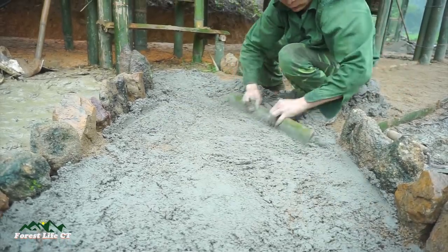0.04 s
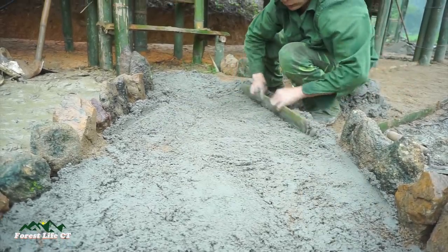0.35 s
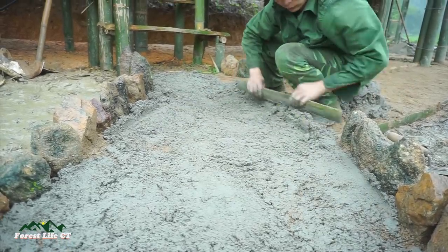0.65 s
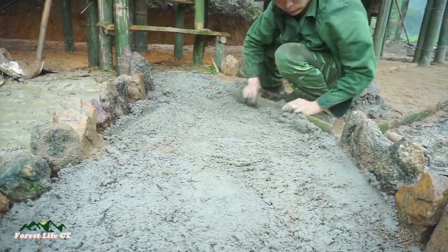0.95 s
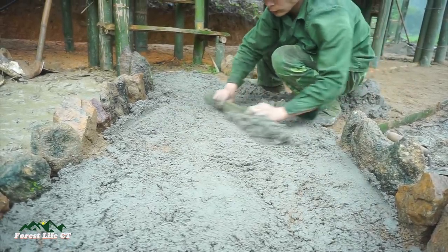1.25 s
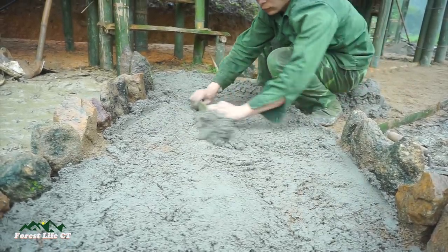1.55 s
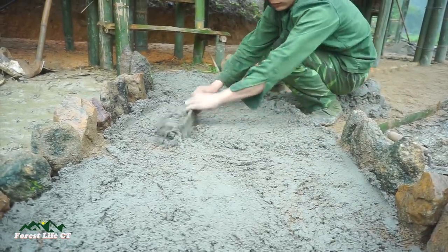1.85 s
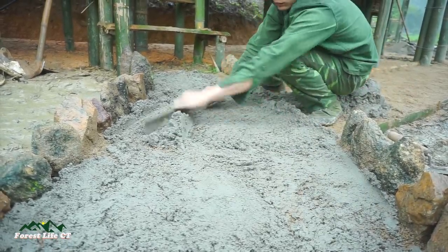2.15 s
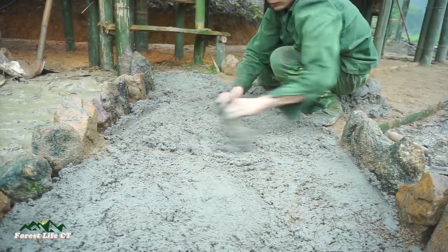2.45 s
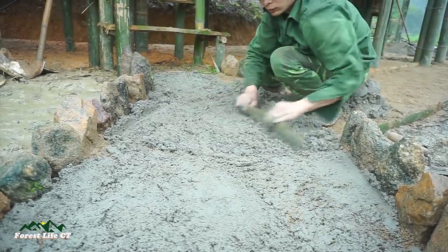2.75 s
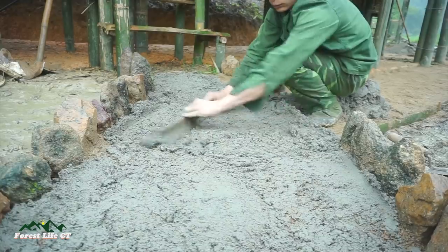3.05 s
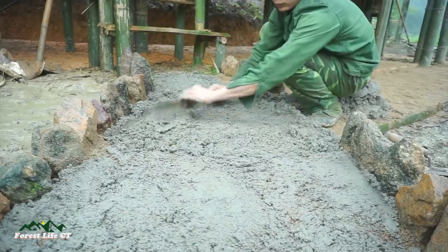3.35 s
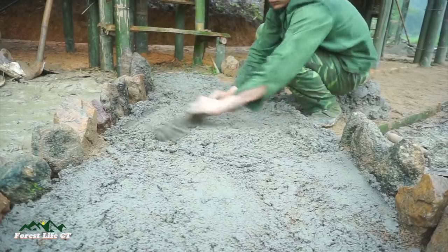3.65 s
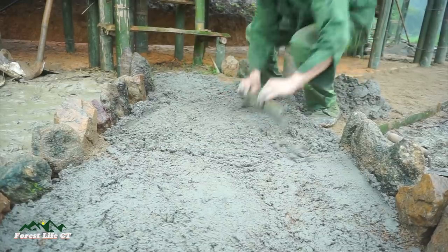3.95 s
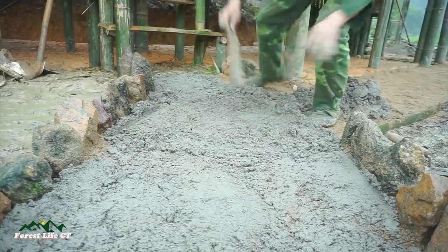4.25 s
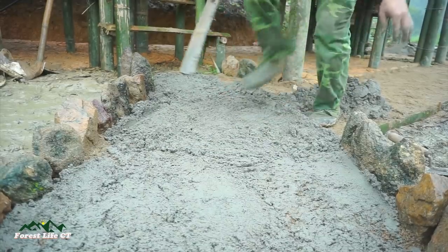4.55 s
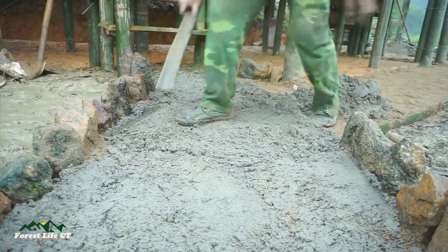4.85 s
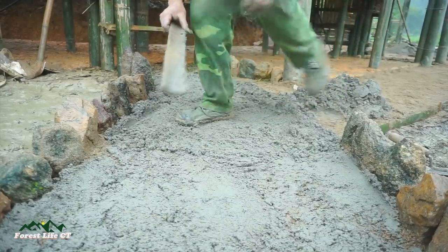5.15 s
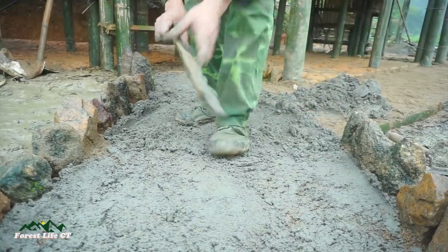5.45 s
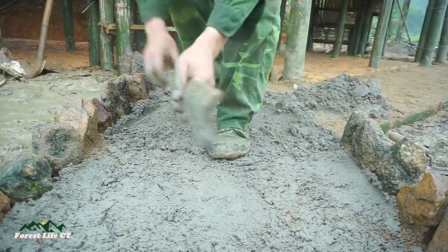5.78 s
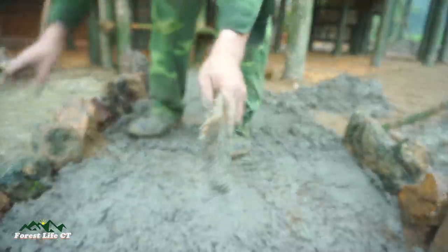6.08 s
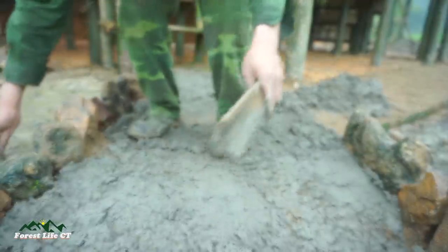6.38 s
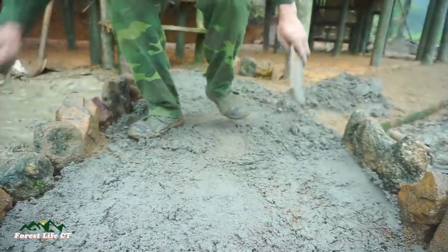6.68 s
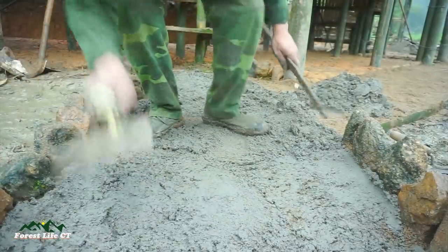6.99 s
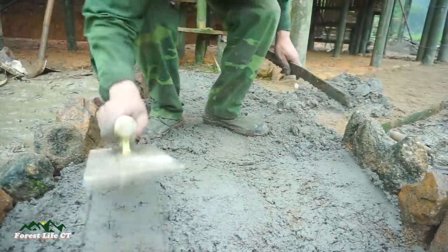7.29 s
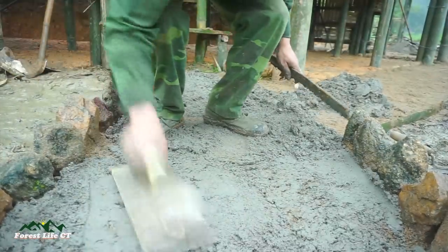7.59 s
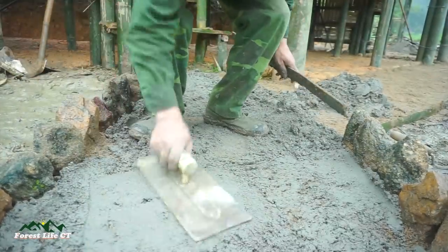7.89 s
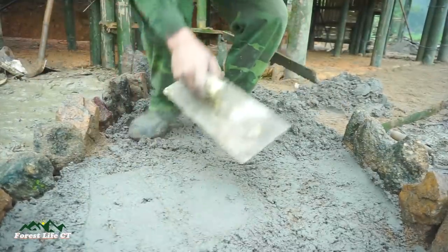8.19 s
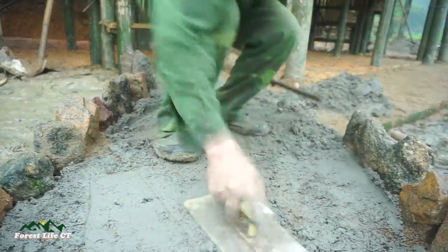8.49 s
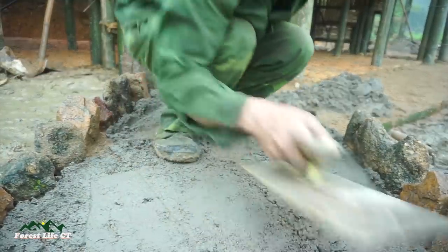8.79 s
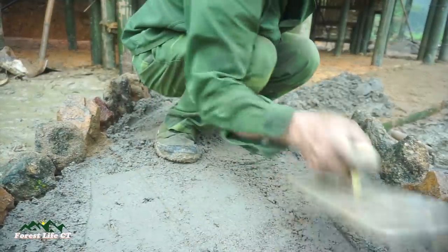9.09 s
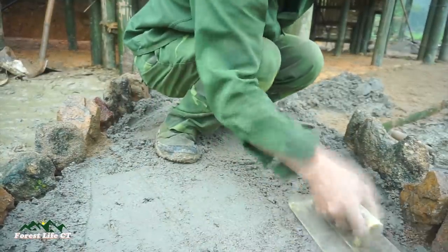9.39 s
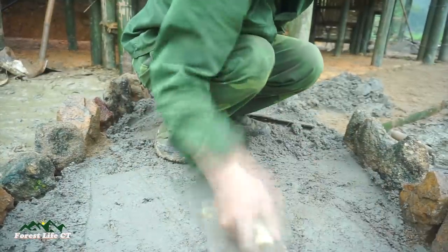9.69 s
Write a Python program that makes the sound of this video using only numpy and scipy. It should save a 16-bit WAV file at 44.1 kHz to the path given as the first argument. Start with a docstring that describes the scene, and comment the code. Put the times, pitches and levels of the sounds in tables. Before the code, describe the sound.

A stick scrapes through wet, gravelly concrete, boots squelch across it, then a steel trowel pats it eight times.

```python
"""Wet concrete, levelled with a flat stick and then patted eight times with a steel trowel, in an open yard.
Sand hisses under the strokes, dragged stones rasp and air pockets squelch; each pat squeezes out a
spray of slurry and shuts with a pop and a dead thump. The work lies to the left of a small two-port
microphone, whose limiter ducks at the loud pats. Far off, an engine hums."""
import sys
import numpy as np
from scipy import signal
from scipy.fft import rfft, irfft, next_fast_len
from scipy.io import wavfile
from scipy.ndimage import uniform_filter1d, minimum_filter1d

SR = 44100
rng = np.random.default_rng(int(sys.argv[2]) if len(sys.argv) > 2 else 0)


def wav_out(sig):
    """Save sig, one row per channel (or a flat mono array), as 16-bit PCM at SR to the path in sys.argv[1]."""
    wavfile.write(sys.argv[1], SR, np.round(np.clip(np.atleast_2d(sig).T, -1, 1) * 32767).astype(np.int16))


N = 429084


def scraping():
    """Paste, gravel, bubbles and sand under the tool; gravel and sand catch and slip together."""
    # spectra of the three parts of the mix: (frequency [Hz], density [dB])
    paste_colour = [(130, -29), (180, -7), (260, -16.5), (400, -8), (550, -2), (690, 2.5), (850, 0),
                    (1200, -2)]
    gravel_colour = [(600, -16), (900, -11), (1350, -1.5), (1900, 0), (2600, 0), (3600, -1.5), (5000, -5),
                     (9000, -28.5)]
    sand_colour = [(2000, -27), (3500, -3.5), (5000, 1.5), (7000, 1.5), (9000, 1.5), (11000, -1)]
    # the paste is louder where the mix is wetter: (time [s], level against the gravel [dB])
    wetness = [(0, -16.5), (1.0, -14), (1.55, -14), (1.9, -17), (3.5, -14.5), (4.4, -17.5), (4.75, -12),
               (5.3, -15), (6.2, -12), (6.7, -14.5), (8.0, -13), (8.35, -8), (8.8, -14)]
    wet_db, = in_time(wetness)
    gravel_db, sand_db = stroke_levels()
    slip, drag = drift(rate_hz=59), drift(rate_hz=27)
    paste = rubbed(paste_colour, patchy_db=3.5, patch_hz=19, spread_db=1)
    paste *= from_db(gravel_db + wet_db)
    gravel = rubbed(gravel_colour, patchy_db=1.66, patch_hz=11, spread_db=5)
    gravel *= from_db(gravel_db - 0.9 + slip + 0.57 * drag)
    froth = from_db(gravel_db - 8) * bubbles(per_s=130, spread_db=14, t60=.04)
    sand = rubbed(sand_colour, patchy_db=1.57, patch_hz=21.4, spread_db=3)
    sand *= from_db(sand_db + 0.02 + 0.83 * slip + 0.38 * drag)
    return paste + gravel + froth + sand


def stroke_levels():
    """Gravel and sand levels in dB: each push swells, holds and eases off on top of the steady hiss."""
    # pushes by the stick, then boots (4.2-7 s), then the blade:
    # (time [s], length [s], gravel level [dB], sand level [dB])
    strokes = [(-.03, 0.31, -38.5, -40), (0.417, 0.22, -43, -48), (0.695, 0.13, -57, -40),
               (0.986, 0.14, -49, -39), (1.086, 0.31, -42, -41.5), (1.364, 0.37, -39, -41),
               (1.84, .27, -46.5, -43), (2.117, 0.13, -41, -45), (2.224, 0.35, -44, -40.5),
               (2.598, 0.15, -44, -39.5), (2.769, 0.38, -40.5, -36.5), (3.217, 0.17, -43.5, -41),
               (3.467, 0.23, -42.5, -43.5), (3.64, 0.21, -41.5, -38), (3.93, 0.35, -53, -44.5),
               (4.271, 0.066, -43, -34.5), (4.35, 0.15, -48, -37.5), (4.533, 0.11, -44, -51),
               (4.89, 0.17, -45.5, -42), (5.128, 0.16, -44, -41.5), (5.408, 0.2, -44, -41.5),
               (5.55, .42, -48, -42.5), (5.986, 0.24, -43.5, -43), (6.227, 0.33, -43.5, -43),
               (6.56, 0.18, -49, -62), (6.913, 0.34, -44.5, -41), (7.334, 0.09, -44, -43),
               (8.004, 0.11, -52, -36), (8.105, 0.11, -40, -50), (8.387, 0.089, -38.5, -38.5),
               (8.674, 0.19, -47.5, -38.5), (9.086, 0.12, -43, -49), (9.28, 0.15, -42.5, -55),
               (9.506, .15, -43.5, -47)]
    # the wet mix's steady gritty hiss: (time [s], gravel level [dB], sand level [dB])
    bed = [(0, -40.5, -39), (1.6, -39.5, -38), (2.0, -42, -39), (6.6, -42, -40), (7.5, -43, -40.5),
           (9.73, -42, -40)]
    attack_s, release_s = 0.02, 0.05
    t = np.arange(N) / SR
    power = from_db(in_time(bed)) ** 2
    for s, length, gravel_db, sand_db in strokes:
        during = slice(max(int(s * SR), 0), int((s + length) * SR))
        swell = np.clip((t[during] - s) / attack_s, 0, 1)
        ease = np.clip((s + length - t[during]) / release_s, 0, 1)
        power[:, during] += np.outer(from_db([gravel_db, sand_db]), swell * ease) ** 2
    return 10 * np.log10(power)


def bubbles(per_s, spread_db, t60):
    """Small bubbles burst at random in the churned mix, each ringing at its own pitch; rms 1."""
    out = np.zeros(N)
    draws = rng.random((3000, 5))
    for when, pitch, size, life, chance in draws:
        if chance * len(draws) < per_s * N / SR:
            bubble = ring(1100 * 4.2 ** pitch, t60 * (.5 + life), rise_s=0.0014, glide=0.064)
            add(out, when * N / SR, from_db(spread_db * size - 1.5 * pitch) * bubble)
    return rms_one(out)


def rasps(stray_stones):
    """A dragged stone gives a short spurt of crunching, coloured by the hollow it leaves."""
    # single stone rasps at set times, joined by the strays scattered at random:
    # (time [s], level [dB], centre [Hz], length [s], sharpness [Q])
    stones = [(.01, -34, 2920, 0.091, 1.3), (0.057, -46.5, 360, 0.02, 3.5), (0.412, -33, 3500, 0.034, 0.53),
              (.456, -39, 1390, .02, 1.6), (0.582, -35.5, 5000, 0.026, 1.7),
              (1.006, -32.5, 1340, 0.012, 2.9), (1.229, -31, 2700, 0.0083, 3),
              (1.391, -35, 2400, .025, 1.1), (1.672, -37.5, 2920, 0.027, 1.3),
              (1.856, -31, 6660, 0.029, 3.3), (2.15, -37, 1360, .019, 5), (2.258, -35, 8000, .025, .8),
              (2.478, -34, 3500, 0.022, 1.5), (2.609, -38, 1360, 0.043, 6.2),
              (2.783, -35, 3000, 0.032, 1.1), (2.846, -32, 3200, 0.032, 1.8), (2.931, -33, 4500, .09, .8),
              (3.526, -37.5, 1360, 0.055, 5.7), (3.723, -32.5, 7000, 0.035, .8),
              (4.072, -31.5, 4300, 0.023, 5.8), (4.164, -35.5, 3750, 0.02, 2.2),
              (4.398, -32, 2520, 0.012, 2.6), (4.549, -35, 3370, .013, 5.2),
              (4.694, -30, 2640, 0.026, 0.93), (4.775, -28.5, 3300, 0.032, 0.44),
              (5.291, -33.5, 6000, .008, 1), (5.437, -34, 6500, 0.045, 0.35),
              (5.477, -27.5, 2670, 0.01, 0.64), (5.6704, -22.5, 4200, 0.0032, 2.7),
              (5.68, -32, 4220, 0.01, 3.1), (6.014, -30.5, 8000, 0.0074, 1),
              (6.17, -34.5, 1250, .0044, 2.1), (6.251, -37, 1200, .014, 2.5), (7.032, -33, 4040, .012, 1.1),
              (7.198, -39, 2430, 0.018, 4.6), (8.476, -31.5, 4830, 0.024, 0.82),
              (8.716, -30.5, 3330, 0.027, 3), (9.083, -34, 4200, .014, 5.2)]
    stray_length_s, stray_q = .015, 2.1
    out = np.zeros(N)
    for s, db, hz, length, q in stones + [(*row, stray_length_s, stray_q) for row in stray_stones]:
        grains = burst(length, edge=0.021, spread_db=6.5)
        hollow = resonate(grains, hz, max(q, .6))
        add(out, s, from_db(db - 3) * rms_one(hollow) * grains.std())
    return out


def squelches():
    """Air pockets ring briefly in the thick paste, rising as they open; the tearing wall blurs the ring."""
    # the loudest pockets: (time [s], level [dB], nominal pitch [Hz], ring t60 [s])
    pockets = [(.346, -36.5, 705, 0.022), (1.009, -36.5, 625, .025), (1.271, -33, 704, .025),
               (1.322, -33, 740, 0.028), (1.483, -27, 675, .03), (1.54, -33.5, 684, .025),
               (2.868, -32, 1420, .03), (3.252, -41, 548, 0.09), (3.374, -37, 660, .02),
               (3.395, -34, 1480, .025), (3.45, -39, 694, .025), (3.792, -37, 653, .03),
               (4.064, -32.5, 1188, .025), (4.933, -30, 1490, 0.027), (5.081, -32.5, 1210, .025),
               (5.483, -28, 1810, .025), (5.49, -36, 625, 0.018), (5.764, -33.5, 610, 0.024),
               (5.94, -38, 640, 0.027), (6.254, -34, 670, .025), (6.626, -26.5, 1210, .04),
               (6.979, -35, 575, .02), (8.267, -33.5, 670, 0.028), (8.43, -37, 680, 0.022),
               (9.255, -26, 680, 0.036), (9.386, -35, 708, .025)]
    small_t60_s, pitch_rise_per_s = 0.027, 6.4
    small = by_chance(per_s=1.3, db_range=(-49, -45), hz_range=(554, 776))
    out = np.zeros(N)
    for s, db, hz, t60 in pockets + [(*row, small_t60_s) for row in small]:
        cavity = ring(hz * 0.968, t60, rise_s=0.0025, glide=pitch_rise_per_s * t60)
        tearing = band(burst(length=.009, edge=0.17, spread_db=3.5), hz * .85, hz * 1.48)
        add(out, s, from_db(db - 2.5) * cavity)
        add(out, s, from_db(db - 6) * tearing / np.abs(tearing).max())
    return out


def pats():
    """The blade lands flat: the trapped air cushion pops and the wet, heavy slab gives a dead thump."""
    # landings: (time [s], pop level [dB], pop pitch [Hz], pop t60 [s], thump level [dB], thump pitch [Hz])
    landings = [(7.106, -7.5, 1760, 0.016, -14, 215), (7.4178, 0.5, 866, 0.0065, -36, 180),
                (7.6545, 3, 1000, 0.0046, -20, 250), (7.8604, 1.5, 652, .013, -31, 250),
                (8.535, -5.5, 970, 0.0046, -16, 250), (8.9297, 9, 990, 0.0031, -6, 273),
                (9.2061, 12, 1020, 0.0021, -11, 298), (9.444, 4, 800, 0.0038, -8.5, 305)]
    # the slab's ring under every pat: (pitch [Hz], t60 [s], offset from the thump column [dB])
    slab = (183, 0.03, -15)
    slab_hz, slab_t60, slab_db = slab
    out = np.zeros(N)
    for s, pop_db, pop_hz, pop_t60, thump_db, thump_hz in landings:
        add(out, s, -from_db(pop_db - 7) * ring(pop_hz, pop_t60, rise_s=0.00066))
        add(out, s, from_db(thump_db - 7.5) * ring(thump_hz, t60=0.015, rise_s=0.0011))
        add(out, s, from_db(thump_db + slab_db) * ring(slab_hz, slab_t60, rise_s=0.0016))
    return butter(out, 3, 125, "high")


def sprays():
    """Slurry and air spit out of the closing gap under the blade, which resonates briefly."""
    # spurts of slurry: (time [s], level [dB], length [s], treble roll-off [Hz], gap resonance [Hz])
    spurts = [(7.098, -19.5, 0.0031, 17050, 9500), (7.102, -19.5, 0.0062, 15000, 9100),
              (7.1075, -8.5, 0.0049, 6000, 2580), (7.11, -32, .025, 9000, 1800),
              (7.414, -21, 0.0086, 7000, 1550), (7.6512, -20, 0.00073, 5900, 4920),
              (7.6542, -15.5, 0.0051, 5850, 1900), (7.858, -18.5, 0.0055, 6000, 1840),
              (8.5335, -16, 0.0025, 14900, 6000), (8.537, -25, .004, 7000, 3400),
              (8.9285, -12.5, .0035, 7000, 1750), (9.195, -6.5, 0.0061, 6000, 2600),
              (9.201, -13, 0.0066, 6000, 2680), (9.4364, -9, 0.0047, 5030, 5160),
              (9.44, -17, 0.0056, 5000, 3120)]
    out = np.zeros(N)
    for s, db, length, top_hz, gap_hz in spurts:
        grains = burst(length, edge=0.13, spread_db=3)
        spit = grains + 1.2 * resonate(grains, gap_hz, q=5.5)
        add(out, s, from_db(db + 3.5) * butter(spit, 1, top_hz, "low"))
    return butter(out, 2, 900, "high")


def yard(x, tail_db, t60):
    """The yard adds two near reflections and a faint, dull scatter from the bamboo around."""
    # reflections off the body and the stone kerb: (delay [s], level [dB])
    echoes = [(.0037, -13), (.0082, -55)]
    # spectrum of the scatter: (frequency [Hz], level [dB])
    tail_colour = [(100, -3), (300, 4.5), (700, -1), (1300, 3), (3000, -1), (10000, -22)]
    out = x.copy()
    for delay, db in echoes:
        add(out, delay, from_db(db) * x)
    t = np.arange(SR // 4) / SR
    colour = from_db(at_hz(tail_colour, np.fft.rfftfreq(len(t), 1 / SR)))
    scatter = irfft(rfft(rng.standard_normal(len(t))) * colour, len(t))
    decay = from_db(-60 * t / t60) * (1 - np.exp(-t / 0.0022))
    tail = signal.fftconvolve(x, scatter * decay / np.linalg.norm(decay))[:N]
    return out + from_db(tail_db) * tail


def engine():
    """Only the second and third multiples of a far engine's firing rate carry to the microphone."""
    # the second multiple swells and fades on its way here: (time [s], level [dB])
    swell = [(0, -61.5), (.6, -65.5), (.8, -57), (1.0, -66), (1.38, -60.5), (1.5, -76), (1.68, -63),
             (2.9, -70), (3.22, -65), (3.35, -76), (3.95, -67), (4.65, -78), (4.98, -62.5), (5.35, -85),
             (5.98, -71), (6.85, -82), (7.1, -70.5), (7.9, -74.5), (8.3, -62.5), (8.8, -75), (9.15, -66),
             (9.73, -78)]
    firing_hz, third_db = 52.15, -71.5
    second_db, = in_time(swell)
    phase = 2 * np.pi * np.cumsum(firing_hz * (1 + 0.0076 * drift(rate_hz=2.75))) / SR
    second = from_db(second_db + 1.7 * drift(rate_hz=5.4)) * np.sin(2 * phase)
    third = from_db(third_db + 2 * drift(rate_hz=2.8)) * np.sin(3 * phase + 0.53 * drift(rate_hz=6.3))
    return np.sqrt(2) * (second + third)


def still_air():
    """The faint, low murmur of the open air."""
    # its spectrum: (frequency [Hz], density [dB])
    air_colour = [(20, -15), (45, -13), (80, -8.5), (150, 3.5), (300, 0.5), (600, -24)]
    return from_db(-69.5) * rubbed(air_colour, patchy_db=-1, patch_hz=3, spread_db=2)


def ports(direct, scattered=None, centred=0.):
    """Left and right: the far, right port hears the sound shadowed, phase-shifted and partly scattered."""
    # right port against the left: (frequency [Hz], level [dB])
    shadow = [(100, -0.5), (250, -1.5), (450, -2.5), (850, -4), (1600, -7), (3100, -9.5), (6000, -12.5),
              (11000, -11.5)]
    # its phase against the left: (frequency [Hz], lead [rad])
    lead = [(30, .2), (110, 0.57), (250, 1.42), (500, 1.67), (1000, 1.96), (11000, 1.74)]
    # likeness of the two ports: (frequency [Hz], coherence [0-1])
    likeness = [(100, 1), (300, 0.8), (700, 0.83), (1400, 0.76), (3000, 0.98), (10000, 0.44)]
    size = next_fast_len(N + SR // 10)
    hz = np.fft.rfftfreq(size, 1 / SR)
    right = rfft(direct, size) * np.exp(1j * at_hz(lead, hz))
    if scattered is not None:
        alike = np.clip(at_hz(likeness, hz), 0, 1)
        right = alike * right + np.sqrt(1 - alike ** 2) * rfft(scattered, size)
    shadowed = irfft(right * from_db(at_hz(shadow, hz)), size)[:N]
    unshadowed = irfft(right, size)[:N]
    return np.array([direct, (1 - centred) * shadowed + centred * unshadowed])


def limiter(x):
    """Each pat over the ceiling pulls the recorder's gain down at once; the hiss ducks and comes back."""
    ceiling_db, recovery_db_per_s, look_ahead_s = -7.5, 105, 0.0015
    peak_db = 20 * np.log10(np.abs(x).max(axis=0) + 1e-9)
    over_db = np.maximum(peak_db - ceiling_db, 0)
    recovery = recovery_db_per_s * np.arange(N) / SR
    gain_db = recovery - np.maximum.accumulate(over_db + recovery)
    ahead = int(look_ahead_s * SR)
    return x * from_db(uniform_filter1d(minimum_filter1d(gain_db, ahead), ahead))


def rubbed(colour, patchy_db, patch_hz, spread_db):
    """Grainy noise in third-octave bands; each band swells and fades, as when cavities open and close."""
    lowest, highest = colour[0][0], colour[-1][0]
    edges = 2 ** (np.arange(12, 43) / 3)
    contacts = [grit(N, spread_db), grit(N, spread_db)]
    out = np.zeros(N)
    below = drift(patch_hz)
    for k, (low, high) in enumerate(zip(edges, edges[1:])):
        if high > lowest and low < highest:
            own = drift(patch_hz)
            swell_db = patchy_db * (own + below) / np.sqrt(2)  # half shared with the band below
            gain = from_db(at_hz(colour, np.sqrt(low * high)) + swell_db)
            out += gain * band(contacts[k % 2], low, high)
            below = own
    return rms_one(out)


def grit(size, spread_db):
    """Countless grain contacts of uneven force."""
    return rms_one(rng.standard_normal(size) * from_db(spread_db * rng.standard_normal(size)))


def burst(length, edge, spread_db):
    """A spurt of grains that swells, holds and dies; edge is the share of its length spent swelling."""
    progress = np.arange(int(3 * length * SR)) / (length * SR)
    return grit(len(progress), spread_db) * (1 - np.exp(-progress / edge)) / np.sqrt(1 + progress ** 12)


def ring(hz, t60, rise_s, glide=0.):
    """A damped sine with a soft start, its pitch rising by the share glide over t60 seconds."""
    t = np.arange(int(2 * t60 * SR)) / SR
    envelope = from_db(-60 * t / t60) * (1 - np.exp(-t / rise_s))
    return envelope / envelope.max() * np.sin(2 * np.pi * hz * t * (1 + glide * t / t60 / 2))


def by_chance(per_s, db_range, hz_range):
    """Events at random: rows of (time [s], level [dB], frequency [Hz])."""
    (soft, loud), (low, high) = db_range, hz_range
    draws = rng.random((60, 4))
    return [(when * N / SR, soft + size * (loud - soft), low * (high / low) ** pitch)
            for when, size, pitch, chance in draws if chance * len(draws) < per_s * N / SR]


def drift(rate_hz):
    """A smooth random wander of rms 1, mostly slower than rate_hz."""
    hop, settle = 40, 2000
    pole = np.exp(-2 * np.pi * hop * rate_hz / SR)
    noise = rng.standard_normal(N // hop + settle + 2)
    slow = signal.lfilter([1], [1, -2 * pole, pole * pole], noise)[settle:]
    return np.interp(np.arange(N) / hop, np.arange(len(slow)), rms_one(slow))


def resonate(x, hz, q):
    """One resonance, with gain 1 at its centre."""
    return signal.lfilter(*signal.iirpeak(hz, q, fs=SR), x)


def butter(x, order, hz, kind):
    """Butterworth filter."""
    return signal.sosfilt(signal.butter(order, hz, kind, fs=SR, output="sos"), x)


def band(x, low_hz, high_hz):
    """Band-pass, its top held under half the sample rate."""
    return butter(x, 2, [low_hz, min(high_hz, .45 * SR)], "band")


def from_db(db):
    """Decibels to gain."""
    return 10 ** (np.asarray(db) / 20)


def rms_one(x):
    """Scale to rms 1."""
    return x / np.sqrt(np.mean(x ** 2) + 1e-20)


def in_time(rows):
    """Each column of a curve at every sample."""
    s, *columns = np.transpose(rows)
    return [np.interp(np.arange(N) / SR, s, column) for column in columns]


def at_hz(points, hz):
    """Read a spectrum on a log-frequency axis."""
    f, value = np.transpose(points)
    return np.interp(np.log(np.maximum(hz, 1)), np.log(f), value)


def add(track, s, sound):
    """Mix a sound in at time s."""
    at = int(s * SR)
    track[at:at + len(sound)] += sound[:max(N - at, 0)]


def scene():
    """At the microphone: scraping and pats on the left, the far engine and the open air behind."""
    # the trowel moves towards the centre: (time [s], share that escapes the right port's shadow [0-1])
    trowel_place = [(7.1, 0), (7.9, 0.01), (8.5, 0.25), (8.9, 0.17), (9.4, 0.5)]
    centred, = in_time(trowel_place)
    stray_stones = by_chance(per_s=1.5, db_range=(-39, -32.5), hz_range=(1280, 5070))
    direct = scraping() + rasps(stray_stones) + yard(squelches(), tail_db=-7.5, t60=.12)
    concrete = ports(direct, scattered=scraping() + rasps(stray_stones))
    spit = ports(yard(sprays(), tail_db=-17, t60=0.13), scattered=sprays(), centred=centred)
    blows = ports(yard(pats(), tail_db=-19, t60=0.19), centred=centred)
    background = ports(still_air() + engine())
    return concrete + spit + blows + background


def record(dry):
    """Narrow peaks and dips colour the sound, the limiter holds the pats down, the top is cut steeply."""
    # peaks and dips over the whole sound, with a lift in the top hiss:
    # (frequency [Hz], width [Hz], gain [dB])
    tone_colour = [(718, 59, 1.7), (1360, 41, -0.1), (1490, 37, 2), (1980, 230, -1), (2610, 270, 2.24),
                   (3330, 37, 0.5), (4740, 280, 0), (7740, 590, 0.7), (7600, 240, 0), (10700, 570, 2.5)]
    cutoff_hz = 11050
    for hz, width_hz, db in tone_colour:
        dry = dry + (from_db(db) - 1) * resonate(dry, hz, q=hz / width_hz)
    top_cut = signal.ellip(12, .1, 75, cutoff_hz, fs=SR, output="sos")
    return signal.sosfilt(top_cut, limiter(dry))


dry = scene()
out = record(dry)
wav_out(out)
```